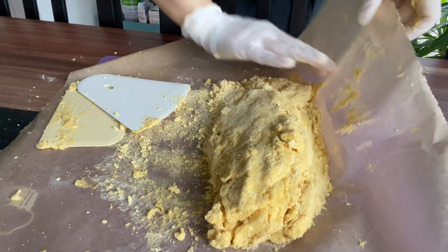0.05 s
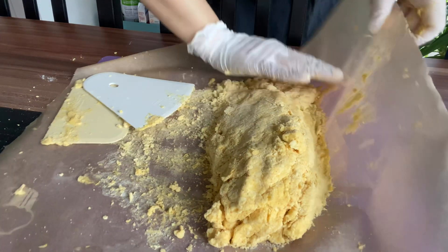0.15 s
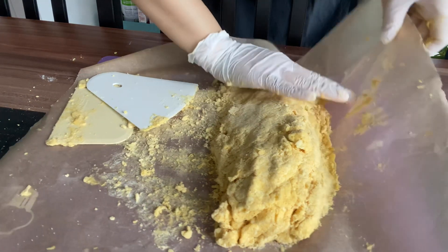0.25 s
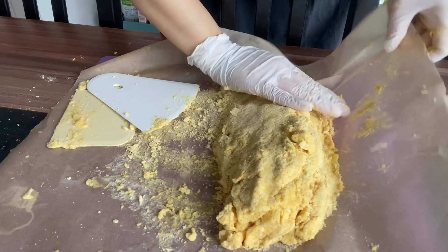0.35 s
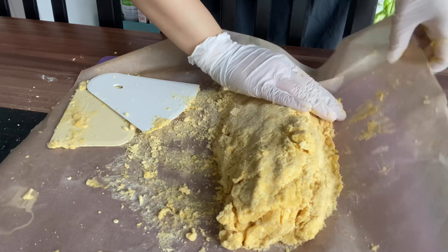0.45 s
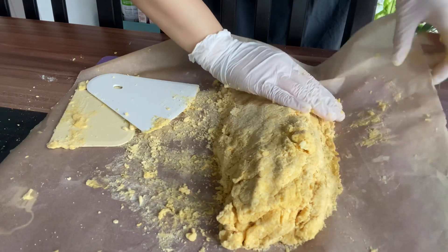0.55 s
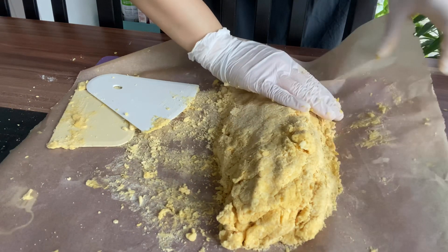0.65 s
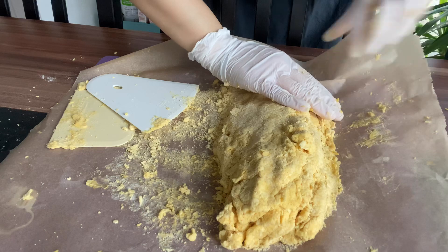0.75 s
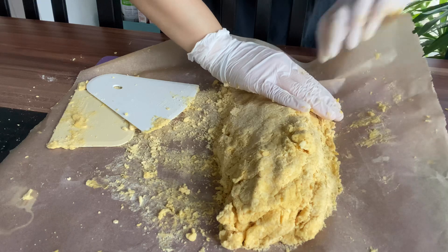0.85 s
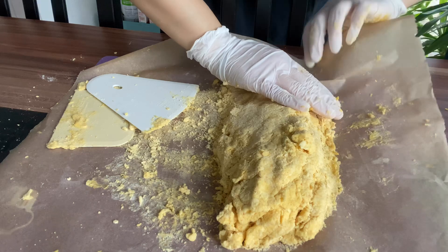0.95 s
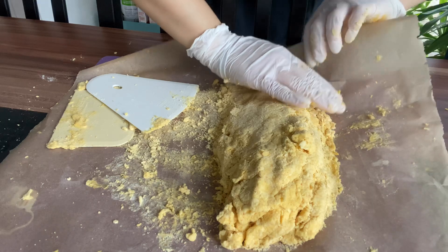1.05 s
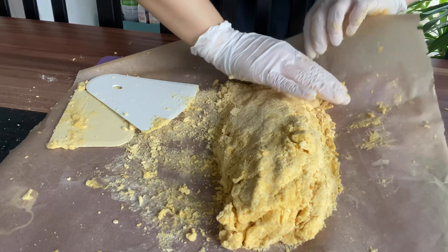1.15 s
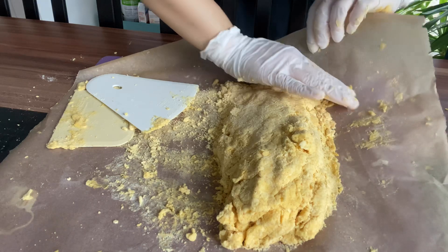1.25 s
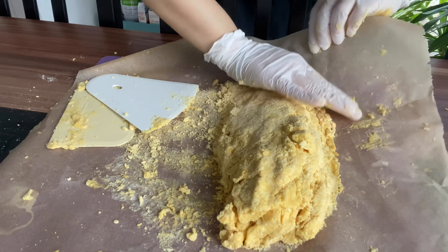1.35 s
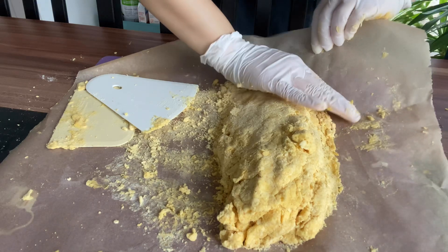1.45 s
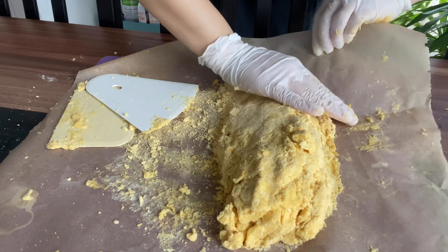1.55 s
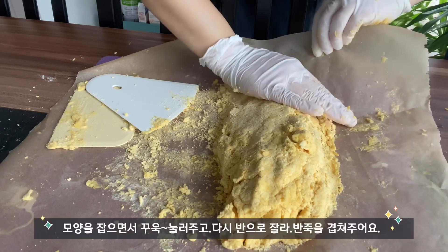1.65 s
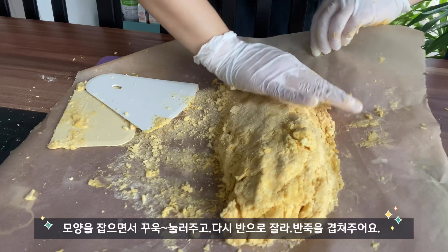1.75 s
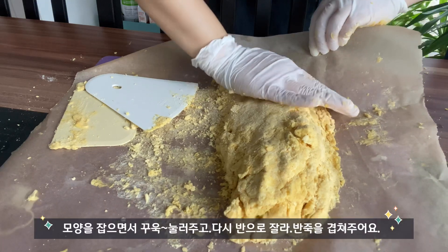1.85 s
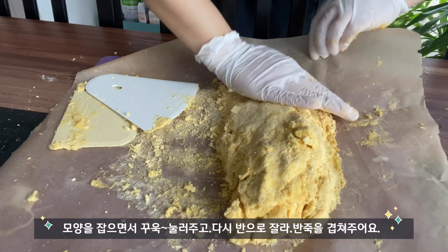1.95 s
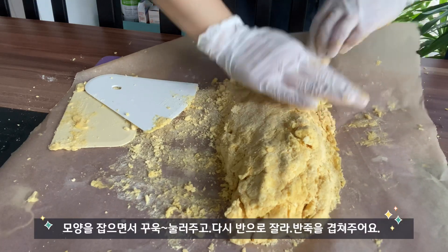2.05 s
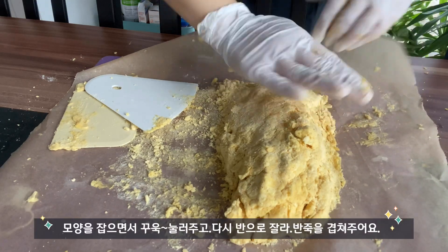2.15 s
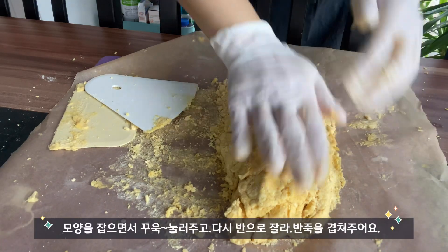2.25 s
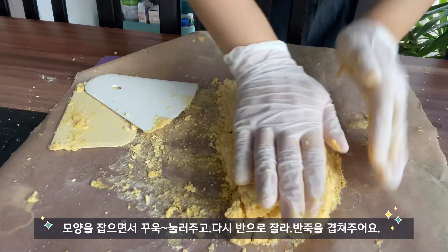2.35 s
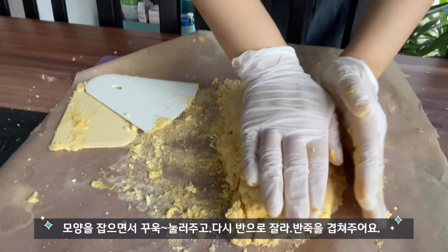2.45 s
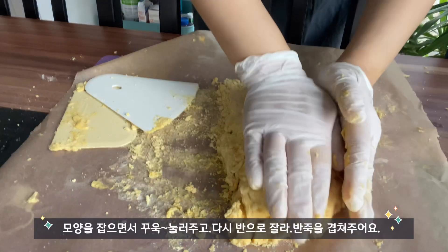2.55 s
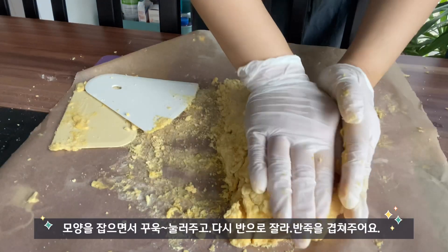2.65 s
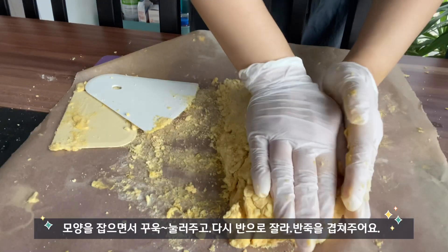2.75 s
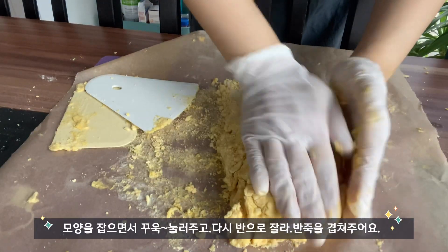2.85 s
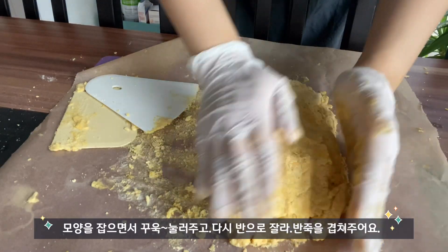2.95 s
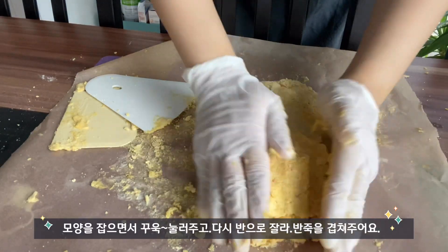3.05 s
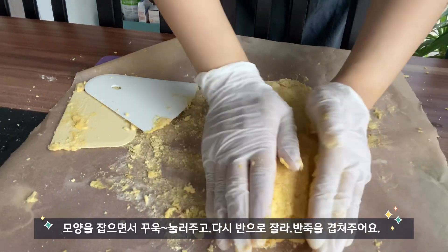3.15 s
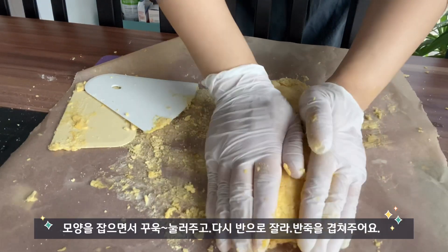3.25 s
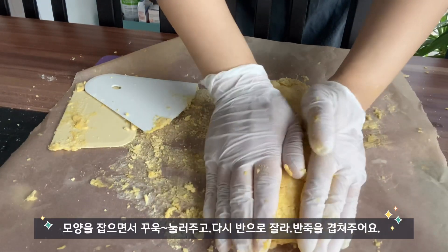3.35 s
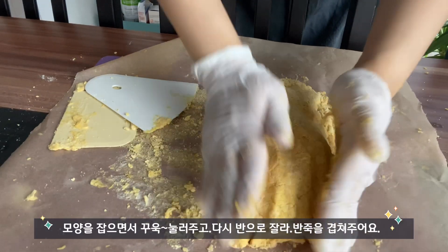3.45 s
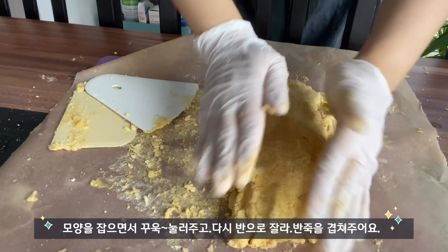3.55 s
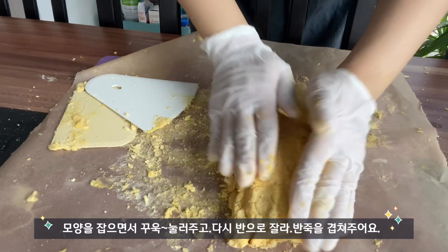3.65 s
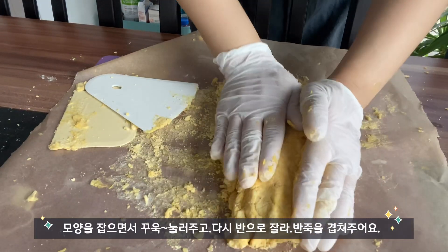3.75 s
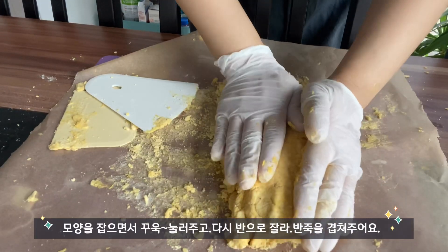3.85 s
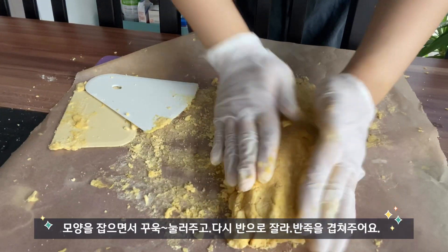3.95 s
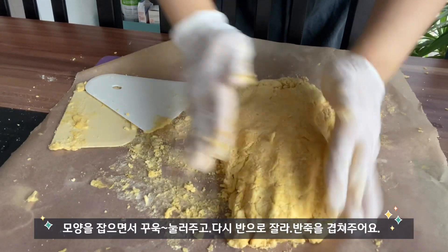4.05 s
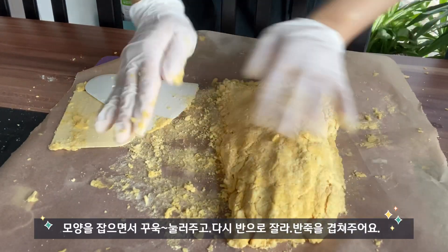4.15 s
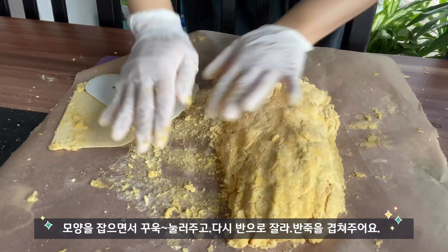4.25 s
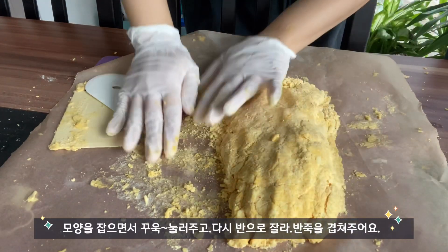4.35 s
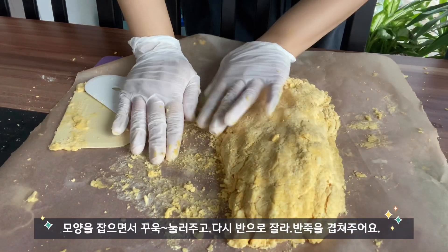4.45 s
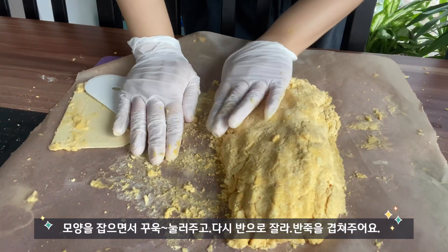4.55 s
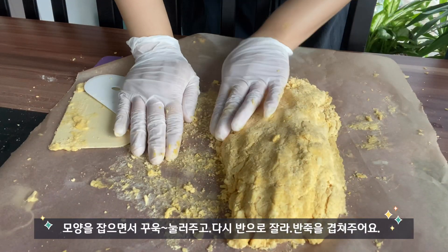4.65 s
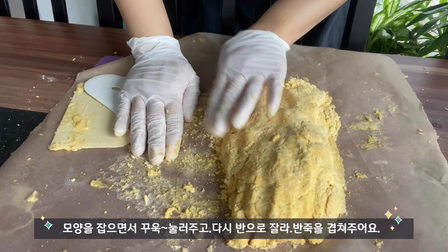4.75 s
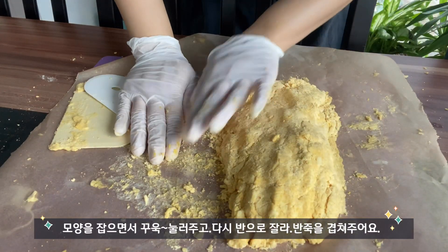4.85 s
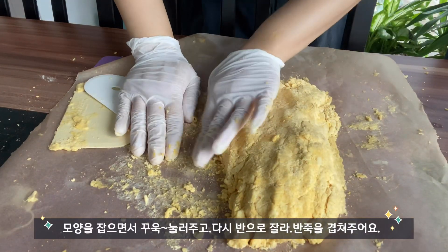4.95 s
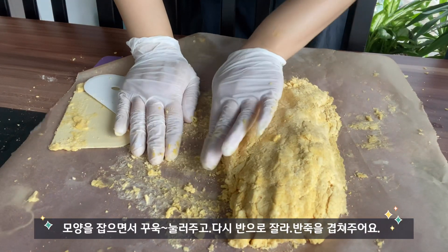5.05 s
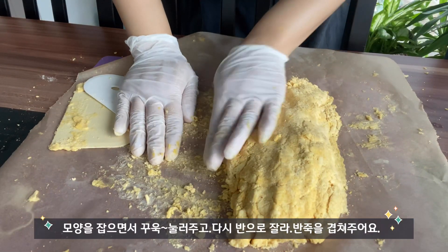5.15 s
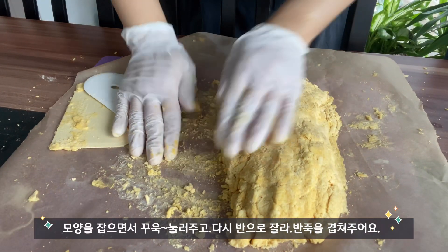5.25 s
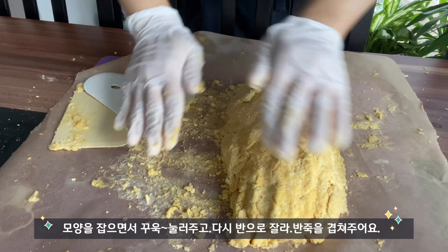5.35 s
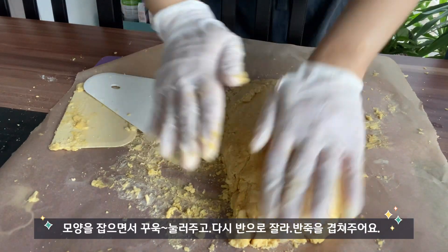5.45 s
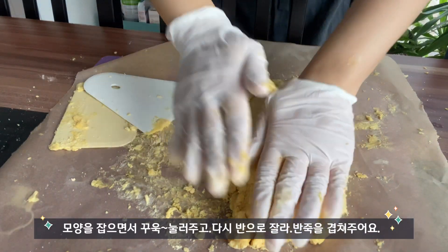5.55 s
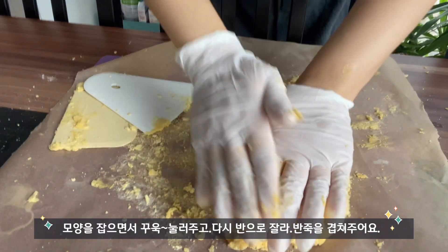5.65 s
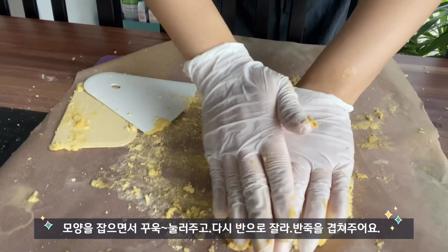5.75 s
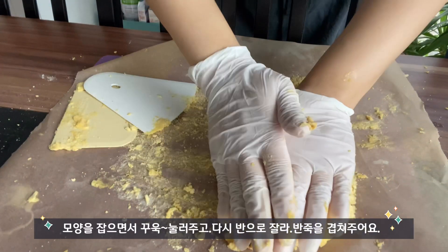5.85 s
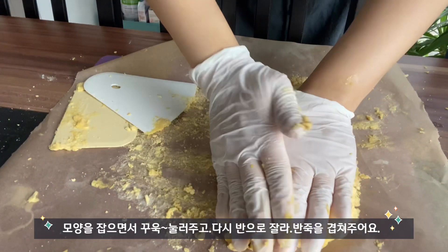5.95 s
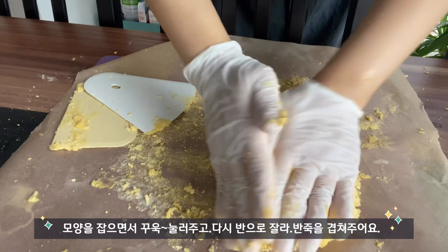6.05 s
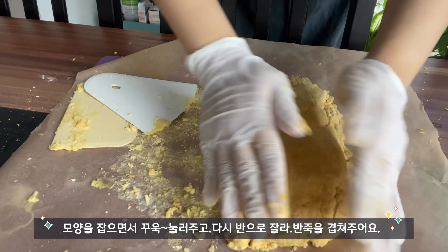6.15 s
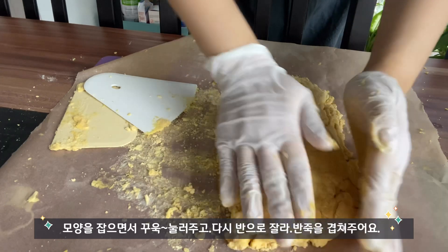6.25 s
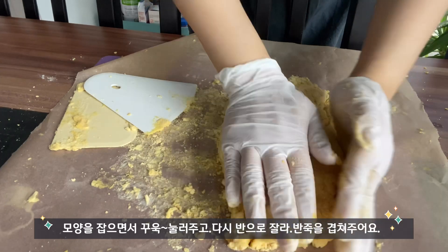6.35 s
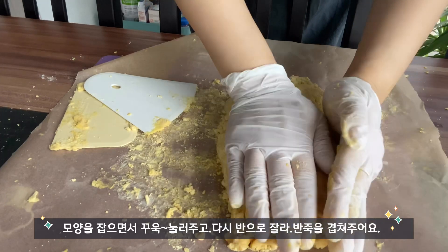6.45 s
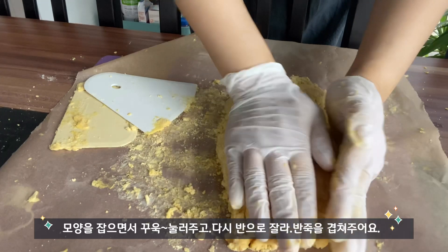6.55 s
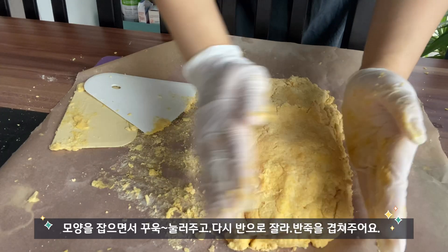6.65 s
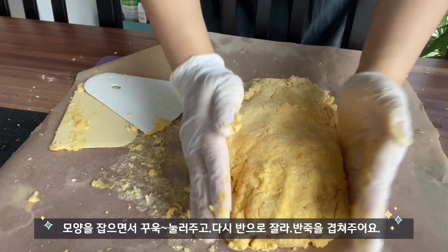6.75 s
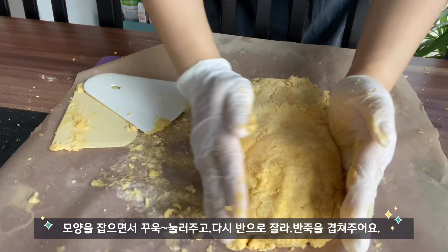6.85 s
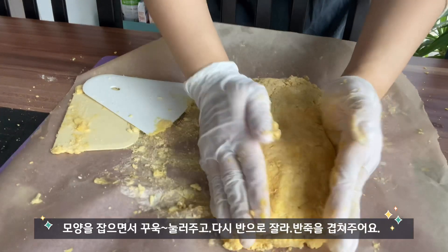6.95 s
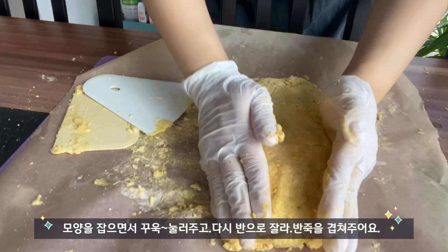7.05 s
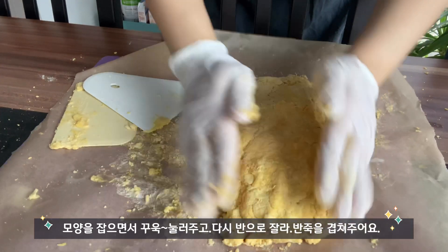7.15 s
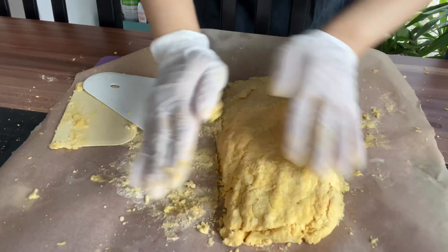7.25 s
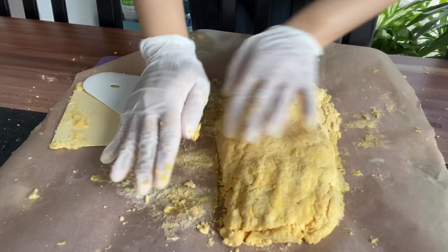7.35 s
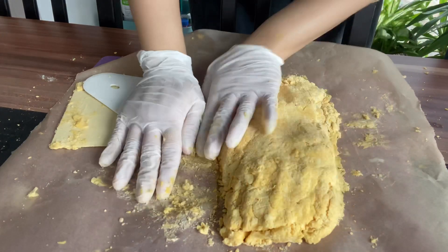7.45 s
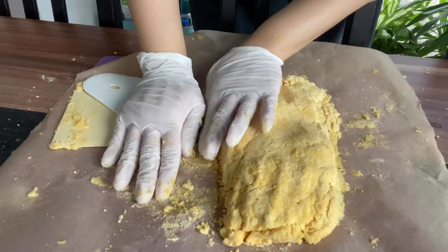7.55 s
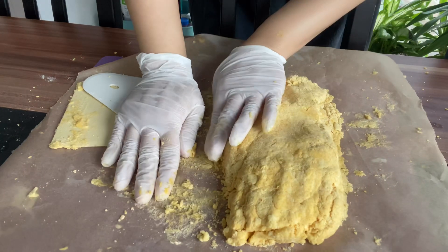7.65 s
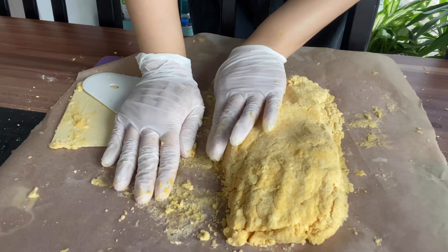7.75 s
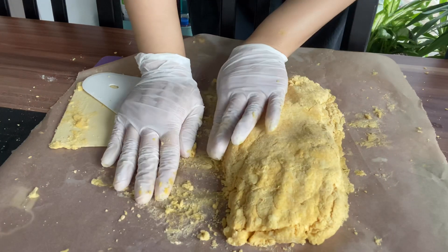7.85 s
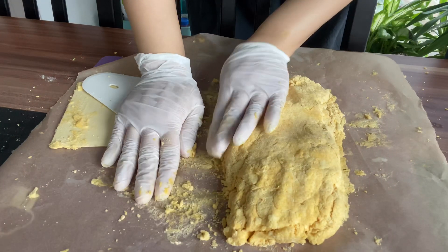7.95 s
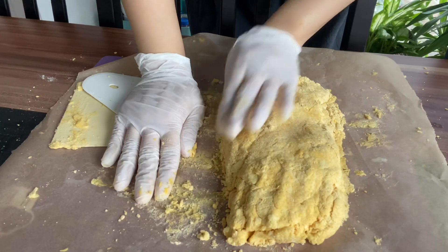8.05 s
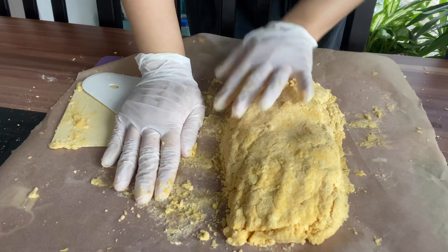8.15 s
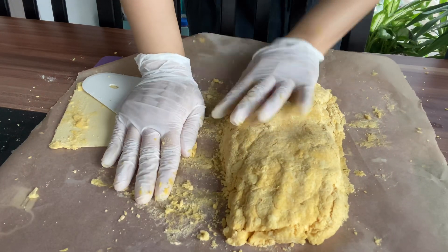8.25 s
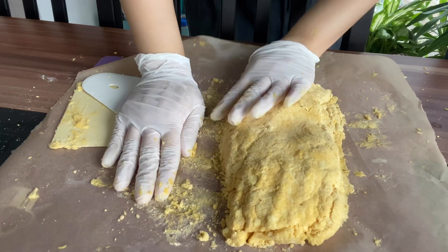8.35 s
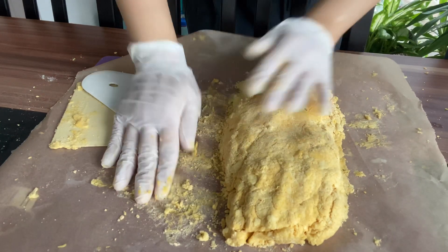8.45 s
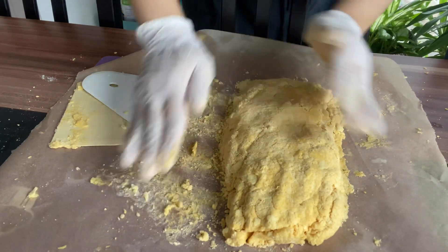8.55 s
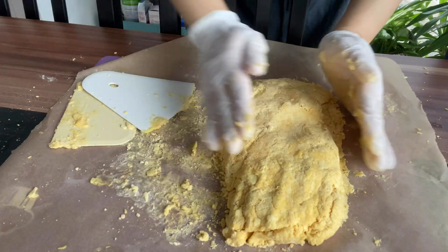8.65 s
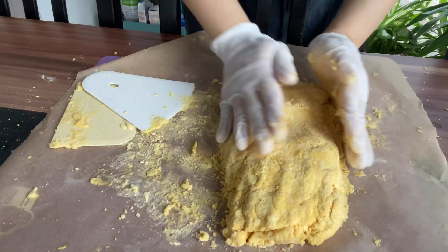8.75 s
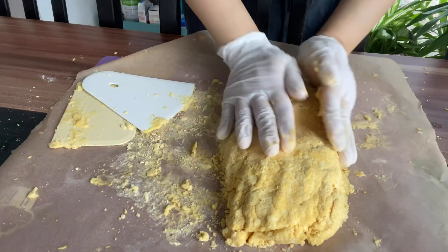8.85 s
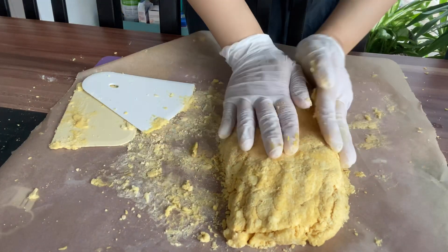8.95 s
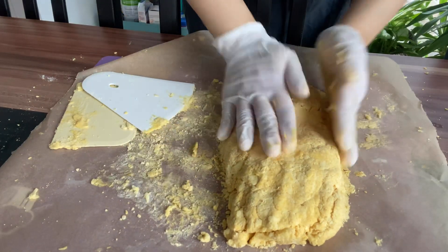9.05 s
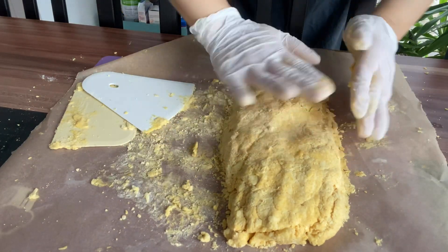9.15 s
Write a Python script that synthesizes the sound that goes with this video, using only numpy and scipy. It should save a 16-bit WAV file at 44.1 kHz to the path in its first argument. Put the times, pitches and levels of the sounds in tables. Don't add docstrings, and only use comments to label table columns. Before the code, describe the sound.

A close stereo phone pickup in a dry, quiet kitchen. From 0 to 0.5 s baking paper is lifted: dense, bright crackles and snaps over rushing rustle, with low air flutter from the flapping sheet. It nearly stops around 0.6-0.85 s. A second flurry runs from 0.9 to 1.8 s, with the hardest, loudest snap at 1.4 s, then smaller crinkles taper off by 2.1 s. From 2.3 s gloved hands pat and shape soft dough: short muffled rubs, light ticks, and a soft pat with a dull table thump near 4.3 s. Quiet pressing and sparse clicks continue to 6.1 s. Crinkles strengthen at 6.2 s, a sharp crackle comes at 6.8 s, and another bright one at 7.55 s. A softer press falls at 8.2 s, then faint rubs and ticks until about 9.2 s. Faint fridge hum and low rumble stay underneath.

```python
import sys
import numpy as np
from scipy import signal
from scipy.fft import rfft, irfft, next_fast_len
from scipy.io import wavfile
from scipy.ndimage import uniform_filter1d

SR = 44100
rng = np.random.default_rng(int(sys.argv[2]) if len(sys.argv) > 2 else 0)


def log_audio(samples):
    frames = np.atleast_2d(samples).T
    limited = np.clip(frames, -1, 1)
    pcm = np.round(limited * 32767).astype(np.int16)
    wavfile.write(sys.argv[1], SR, pcm)


def invert_db(level):
    return 10 ** (np.asarray(level, dtype=float) / 20)


N = 405279
SIZE = next_fast_len(N + SR)
HZ = np.arange(SIZE // 2 + 1) * SR / SIZE + 1e-3

ANCHOR_HZ = [2700, 900, 7000]
ANCHOR_WIDTH_HZ = [3500, 900, 4000]
# start [t/s], length [t/s], tick [level/dB], top minus tick [dB], ring [f/Hz]
RIPS = [(.003, 0.015, -26, -10.5, 2430), (0.145, 0.0067, -30, -6.5, 2630),
        (0.202, 0.0084, -27, -11.5, 3300), (0.304, 0.0061, -26.5, -2, 6800),
        (0.361, 0.0039, -33.5, -4.5, 7130), (1.097, .008, -27.5, -5, 1340), (1.127, .014, -27, -13.5, 2250),
        (1.399, 0.0083, -18.5, -9.5, 4540), (3.505, 0.004, -33.5, 2, 6900),
        (3.509, 0.0037, -41, -5.5, 2500), (6.178, 0.0096, -40, -11, 3300),
        (6.824, 0.0075, -28.5, -0.5, 6000), (7.095, 0.005, -34, -3.5, 6500),
        (1.526, 0.0086, -41.5, -8.5, 1150), (2.176, 0.0066, -42.5, -2.5, 3000),
        (4.291, 0.009, -38.5, -4.5, 1600)]
RIP_TICKS = 6


def on_log(points, hz):
    f, value = np.transpose(points)
    return np.interp(np.log(hz), np.log(f), value)


def shaped(x, gain):
    return irfft(rfft(x, SIZE) * gain, SIZE)[..., :N]


def resonance(hz, width):
    return 1 / (1 + (2 * (HZ - hz) / width) ** 2)


def unit(x):
    return x / np.sqrt(np.mean(x ** 2))


def walk(rate):
    hold = int(SR / rate)
    steps = np.repeat(rng.standard_normal(N // hold + 1), hold)
    return 1.34 * uniform_filter1d(uniform_filter1d(steps, hold), hold)[:N]


def paper(count=2600):
    bands_hz = [400, 900, 1700, 2700, 4400, 7000, 11500]
    # [f/Hz], [level/dB]
    sheet_colour = [(400, -7), (900, -4), (1800, -4), (2700, -3.5), (4500, 0), (7000, 0), (10000, 2),
                    (13000, -6.5), (15000, -6.5), (16400, -13)]
    # [f/Hz], width [f/Hz], [level/dB]
    sheet_peaks = [(1840, 280, 2), (2290, 150, 3.5), (3000, 360, 1.5), (4880, 100, 1)]
    # [t/s], left minus right [level/dB]
    hands_pan = [(0.0, 6), (0.12, 1.5), (2.74, 0.5), (3.27, 3), (3.35, 0), (5.19, 3), (5.32, 0), (5.72, 1),
                 (5.8, 0.5), (7.67, 3), (7.72, 3), (9.18, 0)]
    patchy_db, snap_peak_late_s = 2.2, 0.0008
    crack_hz, crack_db, crack_cycles, crack_per_db = 4280, -13.5, 3.5, 0.07

    t = np.arange(N) / SR
    rub = strokes(t)
    when, peak, low, top, ring_hz = snaps()
    at = ((when + snap_peak_late_s) * SR).astype(int)

    chance = rng.random((count, 3))
    tiny_at = (chance[:, 0] * N).astype(int)
    tiny_db = 0.5 + np.minimum(-2.5 * np.log(1 - chance[:, 1]), 5.5)
    tiny_hz = 1200 * (6000 / 1200) ** chance[:, 2]
    tint = rng.standard_normal((count, len(bands_hz)))
    snap_tint = rng.standard_normal((len(at), len(bands_hz)))

    single = np.arange(len(at)) < len(at) - RIP_TICKS * len(RIPS)
    shiver_db = np.where(single, -9.5, -16)

    air = rng.standard_normal((2, N))
    drag, spectrum = walk(60), 0
    for k, hz in enumerate(bands_hz):
        rub_db = band_db(rub, hz)
        power = invert_db(rub_db + 1.5 + 2.04 * drag + patchy_db * walk(50)) ** 2
        tiny = invert_db(rub_db[tiny_at] + tiny_db + 4.07 * tint[:, k])
        power = power + bursts(tiny_at, tiny, 0.00059, 0.017)
        snap = invert_db(band_db([peak, peak + low, peak + top], hz) + 1.3 * snap_tint[:, k])
        power = power + bursts(at, snap, 0.00072, 0.008)
        power = power + bursts(at, snap * invert_db(shiver_db), 0.0011, 0.05)
        share = np.interp(np.log(HZ), np.log(bands_hz), np.arange(len(bands_hz)) == k)
        spectrum = spectrum + rfft(air * np.sqrt(power), SIZE) * share

    ring = rings(tiny_at, tiny_hz, invert_db(rub[0][tiny_at] + tiny_db - 14.5), 2.8)
    ring = ring + rings(at, ring_hz, invert_db(peak + np.maximum(top, 0) - 1), 23)
    crack = invert_db(peak + crack_db + crack_per_db * (peak - peak.mean()))
    ring = ring + rings(at, crack_hz * invert_db(top / 4), crack, crack_cycles)

    colour_db = on_log(sheet_colour, HZ)
    for hz, width, db in sheet_peaks:
        colour_db = colour_db + db * resonance(hz, width)
    noise = irfft(spectrum * invert_db(colour_db), SIZE)[:, :N]
    side_db = 0.51 * np.interp(t, *np.transpose(hands_pan))
    return noise + ring * np.array([[1], [0.2]]), side_db


def strokes(t):
    # peak [t/s], peak [level/dB], swell [t/s], fade [t/s], low body minus peak [dB]
    lifts = [(0.005, -31.5, .1, 0.16, -6), (.155, -29, .14, 0.065, -11.5), (.23, -36.5, .1, 0.17, -6),
             (.319, -36.5, .15, 0.16, -6.5), (.49, -42.5, .3, 0.079, -6.5), (.675, -53.5, .3, .04, -9.5),
             (.8, -57, 0.23, .25, -5), (.952, -37.5, .05, 0.13, -8.5), (1.122, -32, .12, 0.094, -5),
             (1.267, -39.5, .2, 0.15, -4), (1.41, -36, .04, 0.13, -8.5), (1.53, -54, 0.087, 0.12, 0.5),
             (1.66, -50, 0.12, 0.04, -10), (1.741, -45.5, .14, 0.19, -4.5), (1.85, -58.5, 0.092, 0.067, -1),
             (1.995, -39, .1, 0.083, -5.5), (2.17, -54, .3, .13, -14)]
    pats = [(2.34, -46.5, 0.017, 0.33, -13.5), (2.69, -76, .1, .12, -6), (2.803, -52.5, 0.15, 0.082, -8),
            (2.946, -49.5, 0.02, 0.23, -20.5), (3.06, -54.5, 0.103, 0.081, -1),
            (3.163, -53, 0.26, 0.094, -12.5), (3.384, -53, 0.13, 0.38, -13),
            (3.51, -58.5, 0.032, 0.21, -7.5), (3.72, -78, 0.28, 0.14, -10), (3.965, -45, 0.05, 0.054, -12),
            (4.1, -67.5, 0.15, 0.116, -9)]
    presses = [(4.297, -42.5, 0.015, 0.2, -6.5), (4.45, -48, 0.085, 0.074, -9),
               (4.657, -52, .07, 0.11, -5.5), (4.854, -61.5, 0.1, 0.045, -5),
               (4.979, -55.5, 0.13, 0.28, -6), (5.205, -52, 0.116, 0.09, -7.5),
               (5.453, -60, 0.085, 0.09, -6.5), (5.747, -58, 0.34, 0.41, -14), (5.66, -63, .06, 0.062, -5),
               (5.97, -60, 0.15, 0.1, -13.5), (6.03, -58.5, 0.045, .06, -0.5),
               (6.242, -45.5, 0.085, 0.14, -11), (6.32, -58, 0.079, 0.11, -2.5),
               (6.568, -52.5, 0.089, 0.076, -11), (6.824, -36.5, 0.076, 0.13, -13),
               (6.85, -45, .03, 0.042, -11.5), (7.03, -50.5, .012, 0.16, -6.5),
               (7.09, -50.5, 0.11, 0.16, -13.5), (7.36, -52.5, 0.017, 0.41, -4.5),
               (7.558, -39.5, 0.068, 0.063, -12.5), (7.63, -59.5, .1, 0.3, -10),
               (7.972, -68.5, 0.26, 0.277, -0.5), (8.095, -65.5, 0.012, 0.15, 7.5),
               (8.223, -43, 0.041, 0.11, -6.5), (8.434, -55, 0.28, 0.14, -3), (8.73, -50.5, 0.17, 0.24, -9),
               (9.005, -56, 0.068, 0.057, -8.5), (9.185, -70, 0.14, .1, -7.5)]
    stroke_top_db = [-7.5, -5, -8.5]
    top_per_low = -0.14
    low_lingers, top_lingers = 1.185, 0.93
    edge = 0.86

    groups = lifts, pats, presses
    s, db, swell, fade, low = np.vstack(groups).T[:, :, None]
    top = np.repeat(stroke_top_db, [len(g) for g in groups])[:, None]
    top = top + top_per_low * (low - low.mean())
    coarse = t[::64]
    before = (s - coarse) / np.maximum(swell, 0.005)
    after = (coarse - s) / np.maximum(fade, 0.005)
    fall = 20 * np.where(coarse < s, before, after) ** edge
    levels = db - fall, db + low - fall / low_lingers, db + top - fall / top_lingers
    sums = [10 * np.log10(np.sum(invert_db(2 * v), axis=0) + 1e-11) for v in levels]
    return [np.interp(t, coarse, v) for v in sums]


def snaps():
    # [t/s], peak [level/dB], top minus peak [dB], ring [f/Hz]
    lift_snaps = [(0.1007, -28, -7.5, 1680), (0.14, -22, -7, 1620), (0.161, -18, -6.5, 1910),
                  (0.2095, -25.5, -7, 3300), (0.2592, -22.5, -13.5, 2700), (0.2929, -26, 4.5, 7870),
                  (0.3263, -23, -4.5, 2840), (0.4087, -30.5, -7, 2500), (0.4378, -28, -7, 3070),
                  (0.4697, -32.5, -16.5, 2270), (0.4984, -27, -8, 4800), (0.919, -35.5, -4.5, 2050),
                  (0.9787, -29, -5, 3720), (1.0536, -23.5, -2, 1230), (1.1345, -27, -16.5, 2370),
                  (1.1754, -34, 0, 1510), (1.2245, -25.5, -3, 1420), (1.2735, -24, -8.5, 4540),
                  (1.3465, -34, -23.5, 2400), (1.402, -11, -10, 1760), (1.637, -25, -9, 2400),
                  (1.7423, -22.5, -7, 6100), (2.0822, -39, -1.5, 3060)]
    pat_snaps = [(2.6761, -37.5, 0, 6900), (2.6857, -36, -13, 3340), (3.012, -39.5, -13, 2370),
                 (3.0519, -42, -13, 4020), (3.0816, -38.5, -1, 7050), (3.1149, -38, 4.5, 7800),
                 (3.1553, -29, 1.5, 8200), (3.254, -46.5, 2, 7360), (3.2802, -40, -3.5, 7550),
                 (3.3748, -27, -9, 2370), (3.4345, -34, -4, 2330), (3.4539, -35, -8.5, 4130),
                 (3.4938, -42.5, 0.5, 7840), (3.7455, -44, -10, 2960), (3.9556, -36, 2.5, 8400),
                 (4.0853, -54.5, 0, 5570), (4.184, -63.5, 4, 7100)]
    early_press_snaps = [(4.4383, -40.5, -4.5, 2340), (4.6416, -37.5, -18, 1870), (4.9745, -40.5, 3.5, 6300),
                         (5.011, -43.5, -1.5, 2640), (5.024, -33, -7, 2060), (5.06, -34.5, -24, 3700),
                         (5.1602, -45, -5, 1680), (5.2045, -38.5, -10.5, 1840), (5.3437, -46, -6, 2240),
                         (5.361, -49.5, -2, 3310), (5.457, -41, -18.5, 3100), (5.7388, -38, -10.5, 2810),
                         (5.7684, -60.5, 6, 2880), (5.8352, -37, -16, 2330), (5.9574, -46, -5.5, 7320),
                         (5.9876, -50.5, -4.5, 5840), (6.1157, -43.5, -10.5, 1670)]
    press_snaps = [(6.2287, -30, -5, 3230), (6.242, -28, -4.5, 7350), (6.314, -42.5, -0.5, 2500),
                   (6.3893, -42, -7.5, 1640), (6.556, -41, -5.5, 3050), (6.7098, -36, -15, 2780),
                   (6.8073, -29.5, 2.5, 7700), (6.8247, -18, -1, 3640), (6.918, -32, -7.5, 3980),
                   (7.3689, -40, 3.5, 3660), (7.4298, -28.5, -3.5, 7050), (7.4809, -36, -10, 3600),
                   (7.5583, -23.5, -3.5, 5600), (7.6103, -45, 5.5, 4340), (7.639, -42, 0.5, 6260),
                   (7.6884, -50, -1.5, 1770), (7.7267, -40, -20.5, 2480), (7.9656, -37, -21.5, 3360),
                   (8.198, -36.5, -11.5, 1900), (8.2204, -28.5, -5, 1740), (8.3676, -42, -3.5, 1830),
                   (8.3938, -53.5, -8, 1960), (8.5748, -51, -3.5, 2852), (8.6698, -33.5, -11, 3370),
                   (8.6812, -39, -3.5, 1980), (9.1311, -48.5, -17, 1610), (9.1578, -44.5, -19, 1590)]
    stray_snaps = [(0.7244, -38, -17, 3400), (1.2147, -27, -12, 3200), (1.8576, -38, -20, 980),
                   (1.8946, -44, -14.5, 1400), (2.145, -51, -1, 3050), (3.858, -55.5, -9, 4010),
                   (6.791, -32, -5.5, 4500), (7.5458, -28.5, -3, 7900), (0.12, -33.5, -11, 1600),
                   (1.722, -39.5, -12.5, 2300), (.481, -35, -5, 2700), (1.62, -37, -10.5, 2700),
                   (3.24, -46.5, -5, 2500), (6.96, -46.5, -5, 2000), (3.477, -47.5, -14, 2000)]
    fine_snaps = [(0.0944, -19, -4, 1640), (0.3545, -23, -6.5, 3100), (0.403, -21.5, -9.5, 1850),
                  (0.4854, -29, -11.5, 1110), (0.6201, -40.5, 0, 2870), (0.7667, -45.5, -4, 3380),
                  (0.93, -27.5, -7, 3060), (0.9455, -22.5, -7, 1260), (1.0385, -32, -9, 2070),
                  (1.0456, -20.5, -9, 1950), (1.0872, -20, -8.5, 4010), (1.25, -21, -7.5, 2930),
                  (1.3715, -28.5, -11, 2310), (1.6008, -39.5, -8, 1040), (1.819, -41.5, -6, 1270),
                  (1.8487, -34, -11.5, 1400), (1.9101, -37, -7, 2050), (1.9347, -35, -9, 2520),
                  (1.956, -25, -8.5, 4120), (1.9779, -27.5, -7.5, 1270), (2.03, -29, -7, 6480),
                  (2.3341, -38, -1, 7400), (2.7796, -35.5, -8.5, 2900), (2.939, -40.5, -3.5, 8100),
                  (3.3223, -44.5, -8.5, 2440), (3.5814, -42.5, -10, 2150), (3.9458, -30, -9.5, 8310),
                  (4.6154, -45.5, -13, 1930), (5.3887, -50.5, -8, 1100), (5.754, -44, -10, 2580),
                  (6.0477, -46, -12, 2290), (6.576, -39, -3, 8340), (6.77, -31.5, -7.5, 4530),
                  (6.8514, -25.5, -6.5, 7470), (7.0264, -40.5, -16, 3300), (7.3573, -29, -7.5, 2970),
                  (7.899, -54, -11.5, 1330), (8.1474, -52, -12, 1325), (8.1765, -40.5, -12, 1130),
                  (8.3185, -41.5, -7.5, 1770), (8.4282, -43, -13, 3660), (8.6571, -34, -7.5, 2680),
                  (8.8923, -49, 1, 8460)]
    snap_low_db = [-7.5, -19, -16, -20, -12, -17.5, -17]
    low_per_octave_db, low_per_db = -1, -0.03

    fine = np.add(fine_snaps, [0, -7, 0, 0])
    groups = lift_snaps, pat_snaps, early_press_snaps, press_snaps, stray_snaps, fine, rips()
    when, peak, top, ring_hz = np.vstack(groups).T
    low = np.repeat(snap_low_db, [len(g) for g in groups])
    low = low + low_per_octave_db * np.log2(ring_hz / ANCHOR_HZ[0])
    low = low + low_per_db * (peak - peak.mean())
    return when, peak, low, top, ring_hz


def rips(count=RIP_TICKS):
    start, length, db, top, hz = np.transpose(RIPS)[:, :, None]
    chance = rng.standard_normal((3, len(RIPS), count))
    when = start + length * (np.arange(count) + 0.27 * chance[0]) / (count - 1)
    tick_db = db + 3 * chance[1]
    ring_hz = hz * np.exp(0.28 * chance[2])
    rows = np.broadcast_arrays(np.abs(when), tick_db, top, ring_hz)
    return np.reshape(rows, (len(rows), -1)).T


def band_db(levels_db, hz):
    body, low, top = (v - 10 * np.log10(w) for v, w in zip(levels_db, ANCHOR_WIDTH_HZ))
    body_hz, low_hz, top_hz = ANCHOR_HZ
    to_low = np.clip(np.log(body_hz / hz) / np.log(body_hz / low_hz), 0, 1)
    to_top = np.clip(np.log(hz / body_hz) / np.log(top_hz / body_hz), 0, 1)
    return body + to_low * (low - body) + to_top * (top - body) + 10 * np.log10(SR / 2)


def bursts(at, gain, rise_s, t60_s):
    lead = int(4 * rise_s * SR)
    t = np.arange(-lead, int(t60_s * SR)) / SR
    shape = np.where(t < 0, np.exp(t / rise_s), invert_db(-60 * t / t60_s))
    kicks = np.bincount(at, gain ** 2, N)[:N]
    power = signal.oaconvolve(kicks, shape ** 2)[lead:][:N]
    return np.maximum(power, 0)


def rings(at, hz, gain, cycles):
    n = np.arange(min(SR // 50, int(cycles * SR / hz.min())))
    turns = hz[:, None] * n / SR
    grains = gain[:, None] * np.sin(2 * np.pi * turns) * invert_db(-60 * turns / cycles)
    return np.bincount((at[:, None] + n).ravel(), grains.ravel(), N + SR)[:N]


def drags():
    # middle [t/s], length [t/s], [level/dB], [f/Hz], width [f/Hz]
    dough_drags = [(5.66, .06, -64, 2700, 1200), (5.1, .2, -60, 2400, 500), (4.1, .07, -63, 2200, 1500),
                   (5.7, .04, -61, 1660, 150), (8.12, .09, -63, 1500, 1100), (3.4, 0.11, -56, 2350, 300),
                   (6.875, 0.023, -56, 1400, 420), (0.18, .06, -38, 2280, 700)]
    out = np.zeros((2, N))
    for s, length, db, hz, width in dough_drags:
        size, start = int(length * SR), int((s - length / 2) * SR)
        b, a = signal.iirpeak(hz, hz / width, SR)
        rub = signal.lfilter(b, a, rng.standard_normal((2, SR // 4)))[:, :size]
        out[:, start:start + size] += invert_db(db) * unit(rub) * np.hanning(size)
    return out


def table():
    # [t/s], peak [level/dB], [f/Hz]
    thuds = [(0.109, -33, 134), (0.807, -33.5, 106), (1.05, -31.5, 102), (1.268, -35, 220),
             (1.395, -33.5, 171), (3.597, -35.5, 73), (4.304, -34.5, 93.1), (4.843, -34, 164),
             (5.592, -34, 60), (6.257, -34, 89), (7.354, -33, 110.6), (8.181, -31.5, 71.3),
             (8.338, -36.5, 107)]
    # [t/s], [level/dB]
    flap = [
        (0.0, -43),
        (0.72, -67),
        (1.15, -41),
        (1.37, -56.5),
        (1.41, -37),
        (1.47, -63),
        (2.02, -56),
        (2.3, -68),
    ]
    out = np.zeros(N + SR)
    t = np.arange(SR // 2) / SR
    for s, db, hz in thuds:
        start = int(s * SR)
        ring = np.sin(2 * np.pi * hz * t) * invert_db(db - 60 * t / 0.11) * (1 - np.exp(-t / 0.01))
        out[start:start + len(t)] += ring
    rise = (HZ / 130) ** 2 / (1 + (HZ / 130) ** 2)
    flutter = unit(shaped(rng.standard_normal((2, N)), rise / (1 + (HZ / 500) ** 2)))
    flap_db = np.interp(np.arange(N) / SR, *np.transpose(flap), right=-120)
    return flutter * invert_db(flap_db - 7 + 0.94 * walk(18)) + out[:N] * np.array([[1], [0]])


def house():
    # [f/Hz], density [level/dB per Hz]
    rumble_colour = [(15, -36), (28, -7.5), (45, -2.5), (120, -0.5), (235, -3), (330, -11.5), (480, -18),
                     (800, -24.5), (1500, -31), (9000, -37)]
    # [f/Hz], width [f/Hz], [level/dB]
    room_modes = [(49.75, 5.8, -59.5), (122.7, 4.9, -65.5)]
    # [f/Hz], [level/dB]
    fridge_lines = [(246, -68.5), (265.5, -61.5), (303, -73), (400, -77)]
    # from [t/s], to [t/s], [f/Hz], [level/dB]
    far_motor = (0, 2.5, 121, -62)

    rumble = unit(shaped(rng.standard_normal((2, N)), invert_db(on_log(rumble_colour, HZ))))
    out = invert_db(-57.5 + 2.2 * walk(2.76)) * rumble
    for hz, width, db in room_modes:
        out = out + invert_db(db) * unit(shaped(rng.standard_normal((2, N)), resonance(hz, width)))
    for hz, db in fridge_lines:
        turns = np.cumsum(hz + 2.497 * walk(9)) / SR
        line = np.sqrt(2) * invert_db(db + 2 * walk(2.5)) * np.sin(2 * np.pi * turns)
        out = out + line * np.array([[1], [0.3]])
    start, stop, hz, db = far_motor
    t = np.arange(N) / SR
    running = np.clip(10 * np.minimum(t - start, stop - t), 0, 1)
    out[0] += running * np.sqrt(2) * invert_db(db + 2 * walk(8)) * np.sin(2 * np.pi * hz * t)
    return out


def kitchen(x, t60_s=0.024, wet_db=-18):
    t = np.arange(SR // 2) / SR
    tail = rng.standard_normal(len(t)) * invert_db(-60 * t / t60_s) * (1 - np.exp(-t / 0.0021))
    tail = tail / np.sqrt(np.sum(tail ** 2))
    return x + invert_db(wet_db) * signal.oaconvolve(x, tail[None])[:, :N]


def ports(x, lag_s, side_db):
    # [f/Hz], likeness 0-1 [1]
    likeness = [(60, 0.91), (300, 0.8), (650, 0), (1300, 0.7), (3000, 0.15), (5500, 0), (7000, 1)]
    zero_hz, turn_hz, from_hz = 7300, 5600, 5800
    like = np.clip(on_log(likeness, HZ) + (HZ > zero_hz), 0, 0.99)
    treble = 1 / (1 + np.exp((from_hz - HZ) / 300))
    steps = np.pi * (HZ - zero_hz) / turn_hz
    steps = steps - 0.23 * np.sin(4 * steps)
    turn = treble * steps - (1 - treble) * 2 * np.pi * HZ * lag_s
    same, other = rfft(x, SIZE) * np.sqrt([(1 + like) / 2, (1 - like) / 2])
    pair = np.array([(same + other) * np.exp(-1j * turn), (same - other) * np.exp(1j * turn)])
    lean = invert_db(np.array([side_db, -side_db]) / 2)
    return irfft(pair * treble, SIZE)[:, :N] + lean * irfft(pair * (1 - treble), SIZE)[:, :N]


def scene():
    early_lag_s, late_lag_s = -0.000016, 0.0001
    sheet, side_db = paper()
    sheet = kitchen(sheet + drags())
    late = np.arange(N) / SR > 4.15
    near = ports(sheet * ~late, early_lag_s, side_db) + ports(sheet * late, late_lag_s, side_db)
    return near + ports(table() + house(), late_lag_s, np.array([2.2]))


def band_limit(x):
    return signal.sosfilt(signal.butter(12, 16530, fs=SR, output="sos"), x)


def record(dry):
    top_cut = 1 / np.sqrt(1 + (HZ / 16500) ** 400)
    bass_cut = 1 / np.sqrt(1 + (30 / HZ) ** 4)
    return band_limit(shaped(dry, top_cut * bass_cut))


dry = scene()
out = record(dry)
log_audio(out)
```